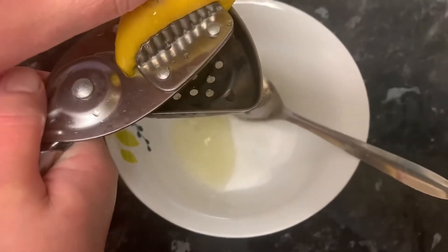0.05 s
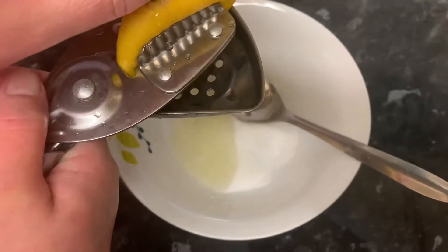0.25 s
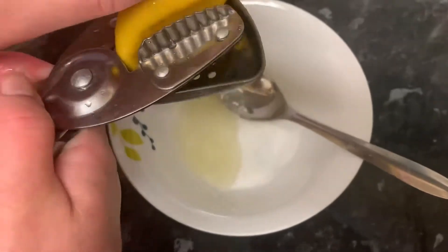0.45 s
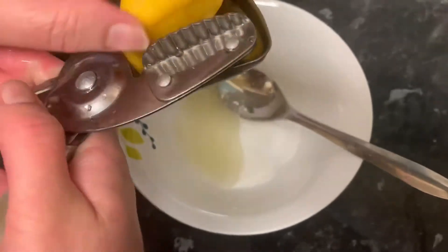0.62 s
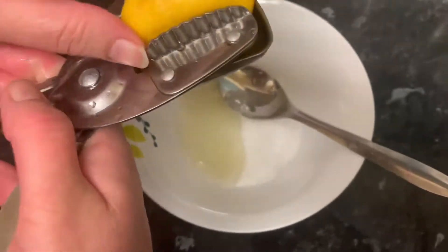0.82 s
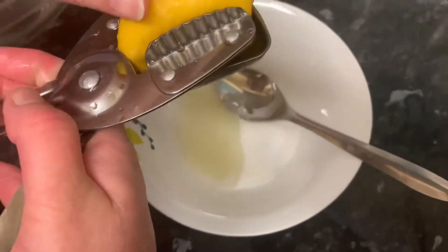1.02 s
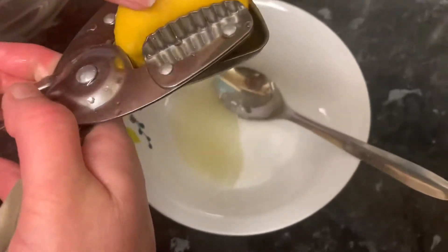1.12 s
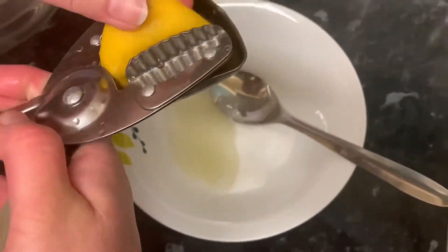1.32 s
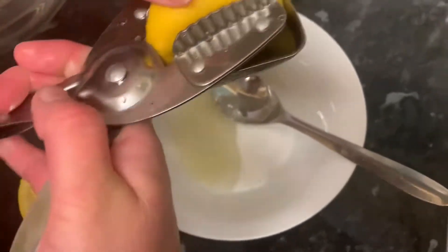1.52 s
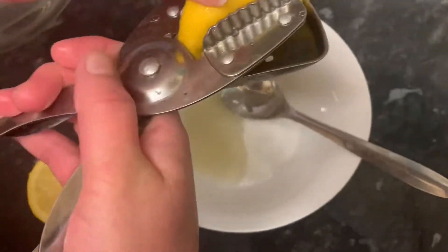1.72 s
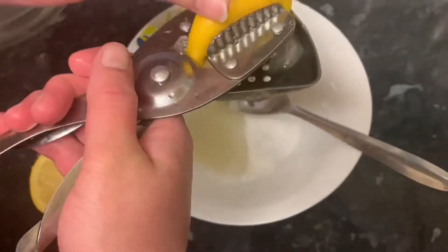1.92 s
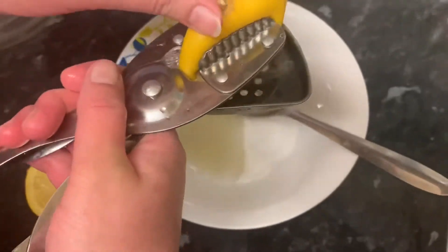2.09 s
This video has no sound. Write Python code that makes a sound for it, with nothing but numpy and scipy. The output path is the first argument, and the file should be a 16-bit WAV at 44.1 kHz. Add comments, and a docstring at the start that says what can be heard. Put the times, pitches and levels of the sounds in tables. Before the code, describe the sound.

Handheld steel citrus squeezer clacks once, is faintly handled, then wet peel pops and scrapes off

```python
"""A hand-held steel lemon squeezer close to a phone in a quiet kitchen, over mains hum, electric whine and room
air. After small ticks the jaw snaps and rattles (decaying modes), then a rub makes the cup squeak (flickering
tones). The cup is tapped (longer modes), then tapped briefly again; soft rubbing (grainy noise), ticks and dull
knocks follow. At the end juice pockets pop (short rings) and the wet peel scrapes off the teeth with squeaks
and ticks."""
import sys
import numpy as np
from scipy import signal
from scipy.fft import rfft, irfft, next_fast_len
from scipy.io import wavfile
from scipy.ndimage import uniform_filter1d, map_coordinates

SR = 44100
rng = np.random.default_rng(int(sys.argv[2]) if len(sys.argv) > 2 else 0)


def to_linear_factor(level_db):
    """Convert decibel levels (scalar or array-like) to linear amplitude factors."""
    exponent = np.asarray(level_db, float) / 20
    return 10 ** exponent


def log_audio(samples):
    """Write samples as a 16-bit WAV file to the path given in sys.argv[1]."""
    # one column per channel
    frames = np.atleast_2d(samples).T
    # limit to full scale, then quantise
    limited = np.clip(frames, -1, 1)
    pcm = np.round(limited * 32767).astype(np.int16)
    wavfile.write(sys.argv[1], SR, pcm)


N = 94815  # samples, 2.15 s

# spectrum of the middle band of rubbing and contact noise: freq_hz, density_db (per Hz, relative)
BODY = [(600, -25), (1300, -3), (2300, 4.5), (3400, 4.5), (5000, -4), (7500, -1.5)]
# spectrum of the bright band of rubbing and contact noise: freq_hz, density_db (per Hz, relative)
TREBLE = [(5500, -27), (7000, -6), (9500, -1.5), (11500, -6.5), (15500, -9), (16600, -55)]


def jaw_snaps():
    """The steel jaw snaps shut and rattles: short high modes with a burst of contact noise."""
    # snaps: start_s, peak_db
    snaps = [(0.2481, -1), (0.3074, -22), (.3162, -23), (0.3544, -33)]
    # jaw modes: freq_hz, level_db (relative), t60_s
    jaw_modes = [(1600, -38.5, 0.0095), (2900, -29.5, 0.008), (6765, -12, 0.0035), (9400, -0.5, .014),
                 (10475, -7, 0.008), (12700, -16, 0.006), (14400, -12.5, 0.0042)]
    sounds = []
    for start_s, peak_db in snaps:
        contact = to_linear_factor(-9) * crack(TREBLE, t60_s=0.012) + to_linear_factor(-36) * crack(BODY, t60_s=0.031)
        sounds.append((start_s, peak_db, ring(jaw_modes, attack_s=0.00056, contact=contact)))
    return sequence(sounds)


def cup_taps():
    """The cup is tapped once at length: lower modes that ring longer than the jaw's, with contact noise."""
    # taps: start_s, peak_db
    taps = [(0.659, -28.5)]
    # cup modes: freq_hz, level_db (relative), t60_s
    cup_modes = [(1900, -1, 0.059), (1978, 5.5, 0.056), (3940, -3.5, 0.033), (5600, -2, 0.0047)]
    sounds = []
    for start_s, peak_db in taps:
        contact = to_linear_factor(5) * crack(TREBLE, t60_s=0.013) + to_linear_factor(-11.5) * crack(BODY, t60_s=0.12)
        sounds.append((start_s, peak_db, ring(cup_modes, attack_s=0.0021, contact=contact)))
    return sequence(sounds)


def squeaks():
    """A rub makes the steel cup sing near 0.5 s, later peel scrapes on the teeth: swaying, flickering tones."""
    # squeaks: start_s, length_s (before the fade), peak_db, pitch_hz
    squeak_rows = [(0.477, 0.018, -44.5, 1900), (0.497, .004, -44.5, 2012), (0.502, 0.015, -39.5, 1900),
                   (.477, 0.046, -39, 2950), (1.731, .006, -29.5, 3400), (1.738, 0.0085, -27.5, 3335),
                   (1.748, 0.031, -31.5, 3400), (1.7965, 0.0041, -28, 7100), (1.794, .016, -37.5, 4540),
                   (1.815, 0.017, -31, 2646)]
    edge_s, t60_s = 0.002, 0.025  # linear fade-in, decay after the held part
    drift, drift_rate = 0.012, 30  # pitch sway as a share, knots a second
    out, t = np.zeros(N), np.arange(N) / SR
    for start_s, length_s, peak_db, pitch_hz in squeak_rows:
        fade_in = np.clip((t - start_s) / edge_s, 0, 1)
        fade_out = to_linear_factor(-60 * np.maximum(t - start_s - length_s, 0) / t60_s)
        flicker_rate = 5e-5 * pitch_hz ** 2  # knots a second
        flicker = 1 + wobble(flicker_rate) + 1j * wobble(flicker_rate)
        phase = 2 * np.pi * np.cumsum(pitch_hz * (1 + drift * wobble(drift_rate))) / SR
        squeak = fade_in * fade_out * np.real(flicker * np.exp(1j * phase))
        out += to_linear_factor(peak_db) * squeak / np.abs(squeak).max()
    return out


def ticks_and_taps():
    """Short rings at one pitch, each lasting 24 cycles: small wet ticks, and brief taps on the cup near 2 kHz."""
    # ticks: start_s, peak_db, pitch_hz
    ticks = [(.043, -42, 5370), (.097, -30, 9300), (0.2231, -27.5, 9800), (.3078, -37.5, 1900),
             (.316, -39, 1366), (0.868, -44, 2020), (.937, -46.5, 3390), (0.972, -45, 2002),
             (.973, -51.5, 1066), (1.100, -38, 2245), (1.688, -25.5, 2800), (1.6885, -29, 3600),
             (1.826, -24.5, 7600), (1.827, -30, 3960), (1.864, -30, 10600), (1.894, -39.5, 3940)]
    return sequence([(s, db, wet_ring(hz, cycles=24)) for s, db, hz in ticks])


def juice_pops():
    """Juice pockets burst as the peel lifts: wet rings of only 10 cycles."""
    # pops: start_s, peak_db, pitch_hz
    pops = [(1.635, -45, 2600), (1.642, -37, 2500), (1.648, -38, 1400), (1.658, -35, 2600),
            (1.668, -36, 2900), (1.673, -33, 1900), (1.6835, -28, 2900)]
    return sequence([(s, db, wet_ring(hz, cycles=10)) for s, db, hz in pops])


def handle_knocks():
    """The hand knocks dully on the handle: low rings of 10 cycles without contact noise."""
    # knocks: start_s, peak_db, pitch_hz
    knocks = [(.895, -51, 538), (.974, -57, 199), (1.001, -53.5, 462), (1.106, -59, 124)]
    return sequence([(s, db, ring([(hz, 0, 10 / hz)], attack_s=0.0004, contact=0)) for s, db, hz in knocks])


def rustle():
    """Skin and wet peel slip in dense grains: three noise bands under one moving level."""
    # fingers and peel rubbing, then scraping: start_s, level_db (middle band),
    # treble_db and bass_db (relative to the middle band)
    rubbing = [(0, -68.5, 10, -2.5), (.2, -67.5, -5, -1.5), (.3, -52.5, -14, -13), (.315, -49, 7.5, -19.5),
               (.43, -59, -6.5, -9.5), (.64, -81.5, 3.5, -5.5), (.67, -65, -4.5, -0.5),
               (1.02, -69.5, -6.5, 3.5), (1.11, -53, -8.5, -16), (1.24, -80, 0.5, 9),
               (1.43, -68, 2.5, -9.5), (1.5, -76.5, -2.5, -5), (1.65, -67, -4, -4), (1.685, -46.5, -5, -16),
               (1.726, -52.5, -5, -23), (1.735, -44, -5.5, -19.5), (1.8, -42.5, 1.5, -22),
               (1.83, -45, -0.5, -27), (1.85, -54, 4, -22.5), (1.91, -58.5, 2.5, -22.5),
               (1.95, -76, 0.5, -6.5), (2.15, -75.5, 16.5, -4.5)]
    # spectrum of the low band: freq_hz, density_db (per Hz, relative)
    bass_spectrum = [(120, -10), (250, -3.5), (550, -7.5), (1500, -12.5)]
    level_db, treble_db, bass_db = curves(rubbing)
    middle = patchy_grain(noise(BODY, grain_db=2.2, rate=350))
    treble = to_linear_factor(treble_db) * noise(TREBLE, grain_db=2.2, rate=260)
    bass = to_linear_factor(bass_db) * noise(bass_spectrum, grain_db=1, rate=180)
    swell_db = 1 * wobble(60)
    return to_linear_factor(level_db + swell_db) * (middle + treble + bass)


def patchy_grain(x):
    """Uneven colour of the rubbing: random gain patches a few hundred Hz wide, some 10 ms long."""
    patch_db = 4  # rms gain swing
    z = signal.stft(x, nperseg=256)[2]
    field = rng.standard_normal(z.shape[1:])
    field = uniform_filter1d(field, size=3, axis=0)  # across frequency
    field = uniform_filter1d(field, size=3, axis=1)  # across time
    return unit(signal.istft(z * to_linear_factor(patch_db * unit(field)), nperseg=256)[1][:, :N])


def kitchen(x):
    """Room sound in two rows, common and unrelated: a short tail in both, one echo in the common row."""
    # tail decay: freq_hz, t60_s
    decay = [(2000, .15), (9400, .22), (13000, .11)]
    tail_db, echo_db, echo_s = -14, -19, 0.009  # echo between worktop and cupboard
    hz, t, z = signal.stft(rng.standard_normal((2, SR // 2)), SR, nperseg=256)
    fade = to_linear_factor(-60 * t / along(decay, hz)[:, None])
    tail = signal.istft(z * fade, SR, nperseg=256)[1]
    tail = tail / np.linalg.norm(tail[0])
    late = np.pad(x, (130, 0))[None]  # the tail starts 3 ms late
    wet = signal.fftconvolve(late, tail, axes=1)[:, :N]
    echo = filtered(x, lambda f: to_linear_factor(echo_db) * np.exp(-2j * np.pi * f * echo_s))
    return to_linear_factor(tail_db) * wet + [echo, 0 * echo]


def electric_whine():
    """A thin electric tone and its octave, with a slightly wandering phase."""
    # whine: start_s, level_db (rms of the fundamental)
    whine_levels = [(0, -65.5), (1.2, -63), (1.55, -66.5), (1.95, -57), (2.15, -60)]
    pitch_hz, octave_db = 7384, -19
    (level_db,) = curves(whine_levels)
    phase = 2 * np.pi * pitch_hz * np.arange(N) / SR + 0.5 * wobble(36)
    return np.sqrt(2) * to_linear_factor(level_db) * (np.sin(phase) + to_linear_factor(octave_db) * np.sin(2 * phase))


def mains_hum():
    """Low tones of the mains at fixed pitches, each wavering in level."""
    # hum tones: freq_hz, level_db (rms before the waver)
    hum_tones = [(49.8, -82), (100, -78.5)]
    t = np.arange(N) / SR
    return np.sqrt(2) * sum(to_linear_factor(db + 2.54 * wobble(6.4)) * np.sin(2 * np.pi * hz * t) for hz, db in hum_tones)


def room_air():
    """Quiet coloured noise whose level drifts a little."""
    # air spectrum: freq_hz, density_db (per Hz, relative)
    air_spectrum = [(20, -22), (45, 2), (120, -3), (300, -34.5), (900, -36.5), (1330, -7), (1800, -31),
                    (5000, -40), (15000, -47)]
    return to_linear_factor(-70.5) * noise(air_spectrum, grain_db=1, rate=14)


def ring(modes, attack_s, contact):
    """A struck part: decaying sine modes plus contact noise under a soft attack, peak 1."""
    t = np.arange(SR // 5) / SR
    x = contact
    for hz, db, t60_s in modes:
        x = x + to_linear_factor(db - 60 * t / t60_s) * np.sin(2 * np.pi * (hz * t + rng.random()))
    x = x * (1 - np.exp(-t / attack_s))
    return x / np.abs(x).max()


def wet_ring(pitch_hz, cycles):
    """One mode that falls 60 dB in so many cycles, with a wet contact crack."""
    contact = crack(TREBLE, t60_s=0.006) / 2
    if pitch_hz < 6000:  # only lower rings get the middle band
        contact = contact + crack(BODY, t60_s=0.006)
    return ring([(pitch_hz, 0, cycles / pitch_hz)], attack_s=0.0004, contact=to_linear_factor(-10.5) * contact)


def crack(spectrum, t60_s):
    """A short decaying noise burst of contact."""
    t = np.arange(SR // 5) / SR
    return noise(spectrum, grain_db=0, rate=1)[0, :len(t)] * to_linear_factor(-60 * t / t60_s)


def sequence(sounds):
    """Lay (start_s, peak_db, sound) rows out on one track."""
    track = np.zeros(N + SR)
    for start_s, peak_db, sound in sounds:
        track[round(start_s * SR):][:len(sound)] += to_linear_factor(peak_db) * sound
    return track[:N]


def noise(spectrum, grain_db, rate):
    """Two unrelated coloured noises, together rms 1, that share one grainy flicker."""
    raw = rng.standard_normal((2, N)) * to_linear_factor(grain_db * wobble(rate))

    def band(hz):  # silent outside the listed range
        return to_linear_factor(along(spectrum, hz)) * (hz > spectrum[0][0]) * (hz < spectrum[-1][0])
    return unit(filtered(raw, band))


def unit(x):
    """Scale to rms 1."""
    return x / np.sqrt(np.mean(x ** 2) + 1e-20)


def along(points, hz):
    """Join (Hz, value) points on a log frequency axis."""
    f, v = np.transpose(points)
    return np.interp(np.log(hz + 1), np.log(f + 1), v)


def curves(rows):
    """One value per sample for each column after the time."""
    s, *cols = np.transpose(rows)
    return [np.interp(np.arange(N) / SR, s, c) for c in cols]


def wobble(rate):
    """A smooth random curve with rate knots a second."""
    knots = rng.standard_normal(int(N * rate / SR) + 4)
    return map_coordinates(knots, [np.arange(N) * rate / SR])


def filtered(x, response):
    """Filter x by a complex response of frequency."""
    m = next_fast_len(N + 8192)
    return irfft(rfft(x, m) * response(np.fft.rfftfreq(m, 1 / SR)), m)[..., :N]


def scene():
    """Left and right as sum and difference of the common and the unrelated sound."""
    hits = jaw_snaps() + cup_taps() + squeaks() + ticks_and_taps() + juice_pops() + handle_knocks()
    tones = electric_whine() + mains_hum()
    centre = hits + tones
    common, apart = kitchen(hits) + rustle() + room_air() + [centre, 0 * centre]
    return np.array([common + apart, common - apart])


def band_limit(x):
    """A steep low-pass at the top of the band."""
    return signal.sosfilt(signal.butter(12, 17040, fs=SR, output="sos"), x)


def record(dry):
    """The phone turns the common sound by a phase per frequency; the treble is nearly one signal."""
    # phase by which the left leads, joined on a plain frequency axis: freq_hz, lead_rad
    lead = [(0, 0), (2000, 1.5), (2700, 2.5), (4300, 6.3), (5200, 8.8), (6200, 6.3), (15600, -6.3)]
    # gain of the unrelated part: freq_hz, gain_db
    apart_gain = [(110, -13), (350, -4), (5500, -1), (6600, -16)]
    # left over right: freq_hz, tilt_db
    tilt = [(150, 0), (1000, 3.5), (2800, -2.5), (8000, 0)]
    side = np.array([[1], [-1]])  # left, right

    def stereo(hz):  # each side takes half the tilt and half the lead
        turn = np.exp(0.5j * side * np.interp(hz, *np.transpose(lead)))
        return to_linear_factor(side * along(tilt, hz) / 2) * turn
    common = filtered(dry.mean(0), stereo)
    apart = filtered((dry[0] - dry[1]) / 2, lambda hz: to_linear_factor(along(apart_gain, hz)))
    return band_limit(common + side * apart)


dry = scene()
out = record(dry)
log_audio(out)
```